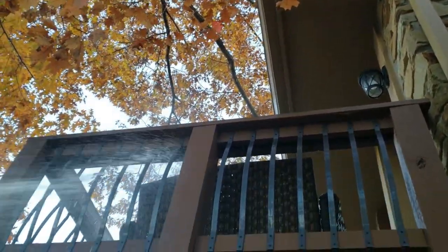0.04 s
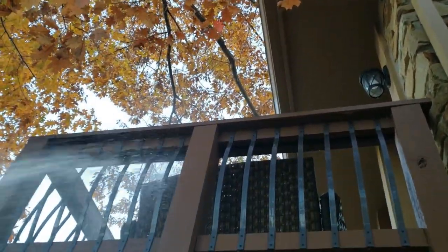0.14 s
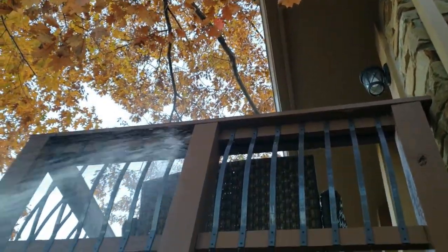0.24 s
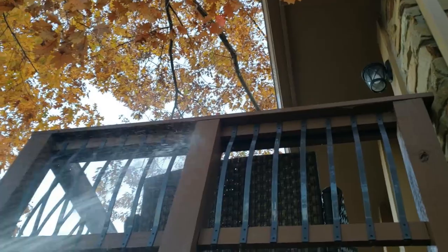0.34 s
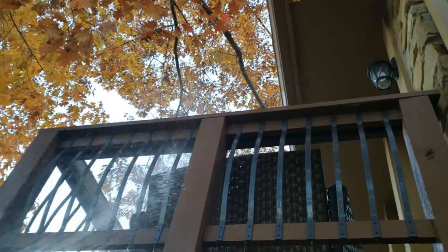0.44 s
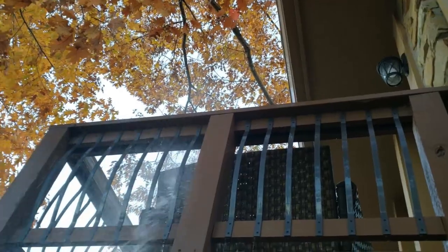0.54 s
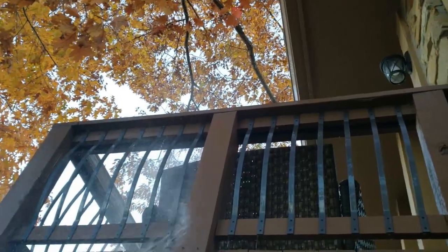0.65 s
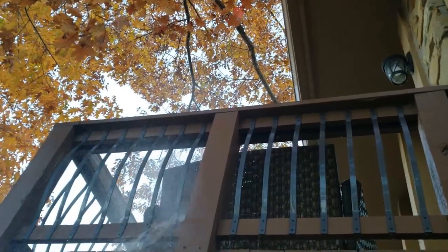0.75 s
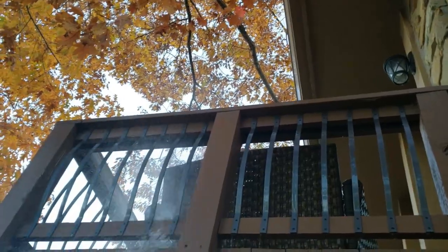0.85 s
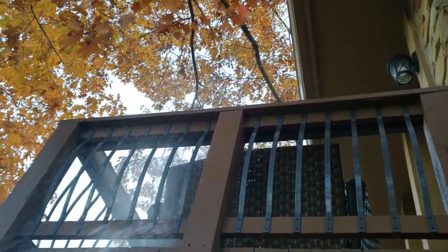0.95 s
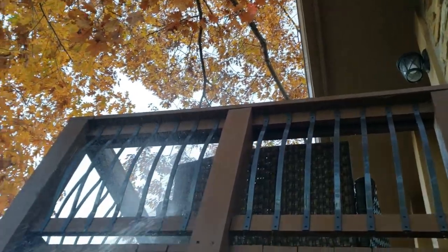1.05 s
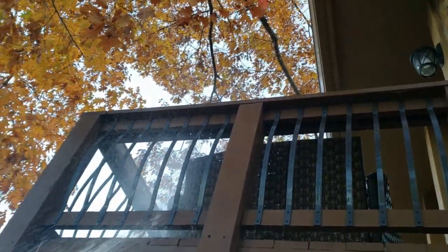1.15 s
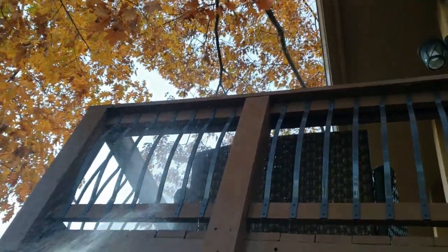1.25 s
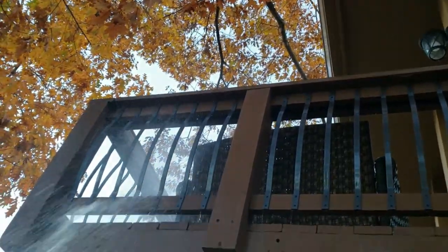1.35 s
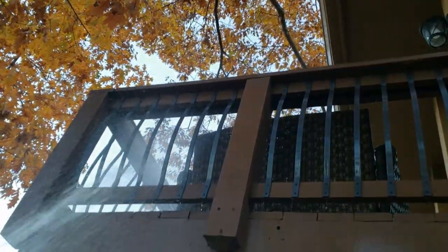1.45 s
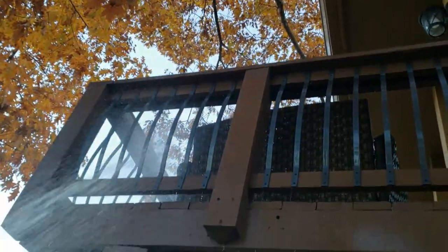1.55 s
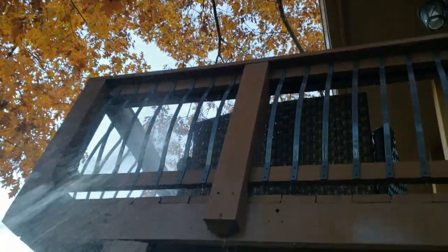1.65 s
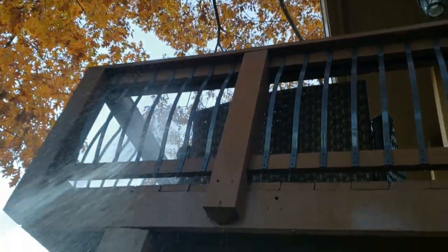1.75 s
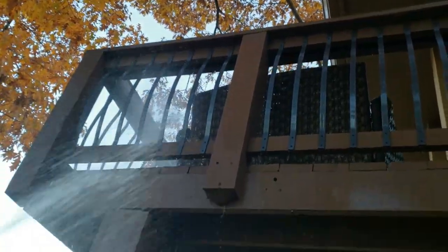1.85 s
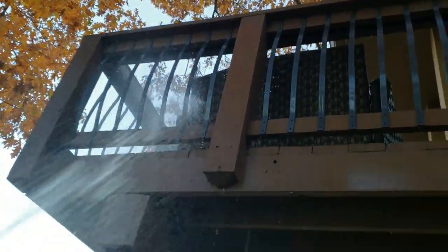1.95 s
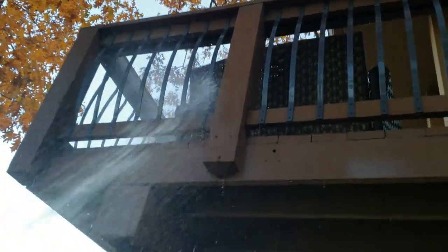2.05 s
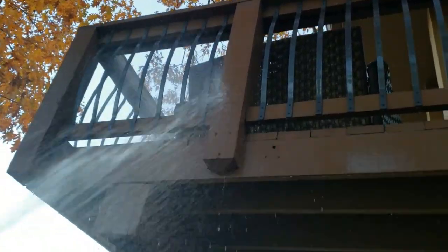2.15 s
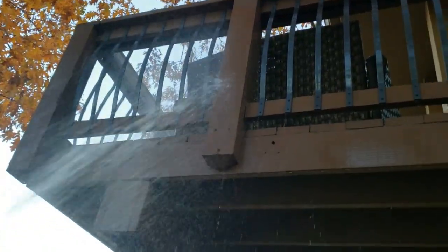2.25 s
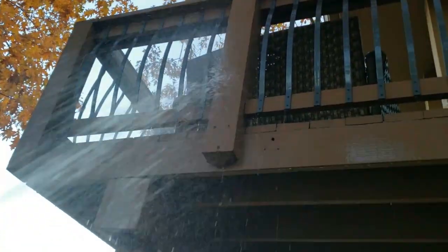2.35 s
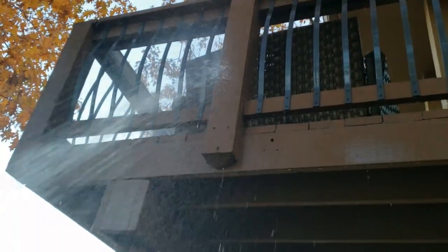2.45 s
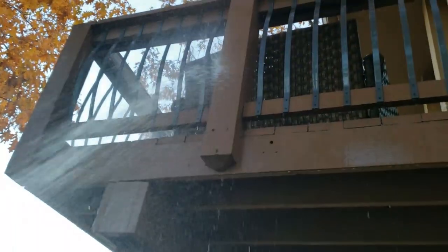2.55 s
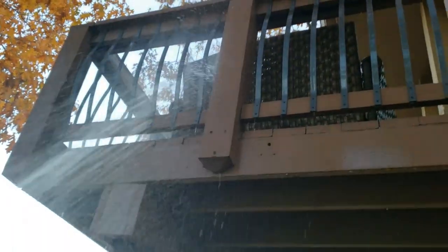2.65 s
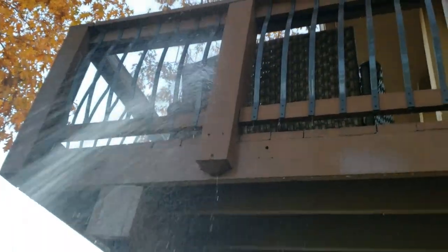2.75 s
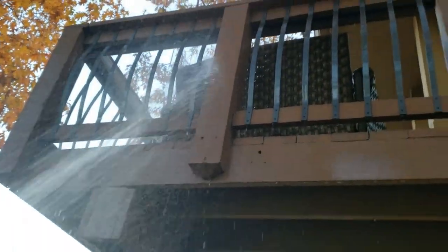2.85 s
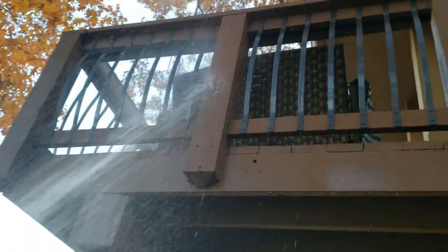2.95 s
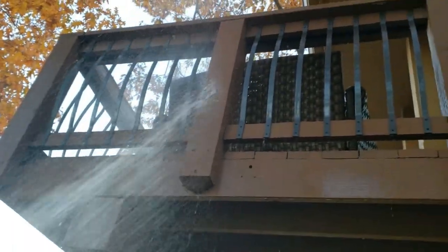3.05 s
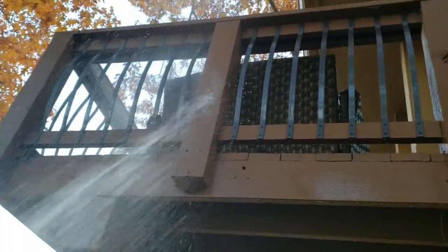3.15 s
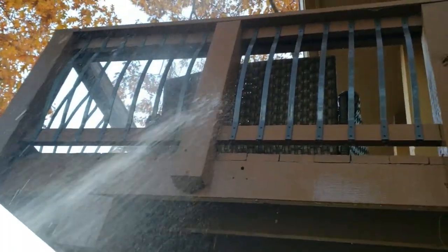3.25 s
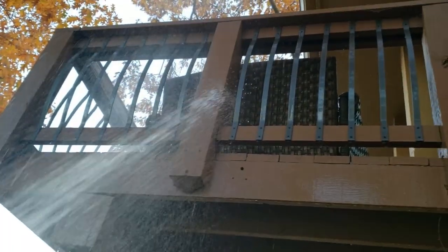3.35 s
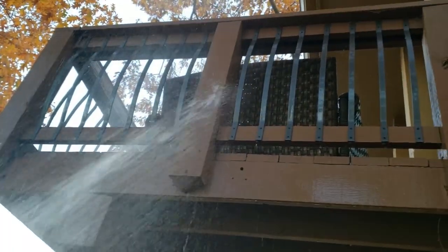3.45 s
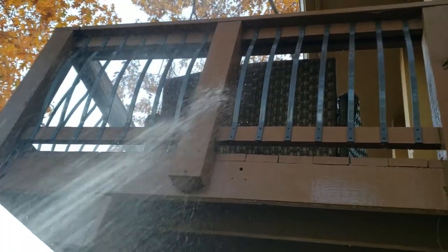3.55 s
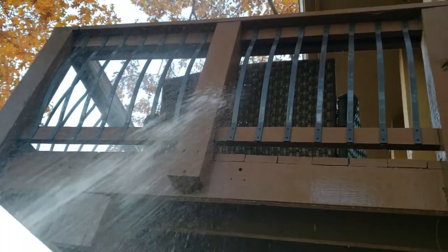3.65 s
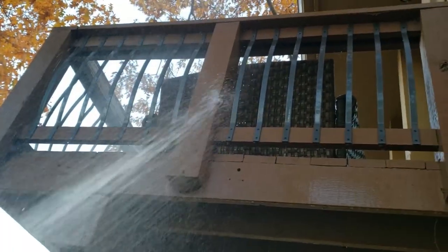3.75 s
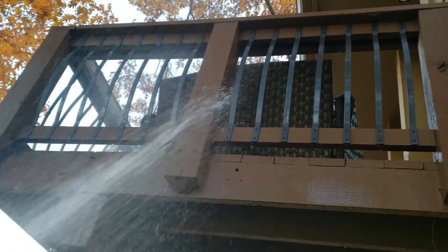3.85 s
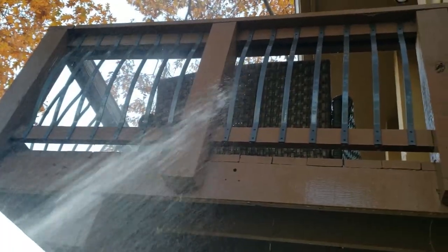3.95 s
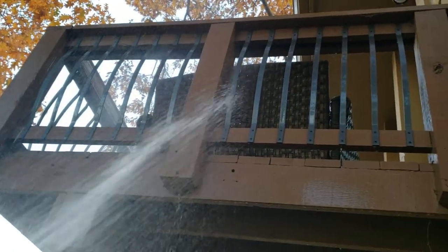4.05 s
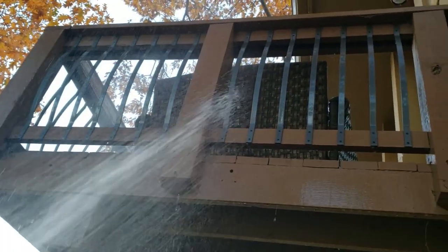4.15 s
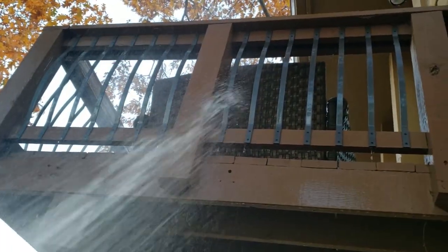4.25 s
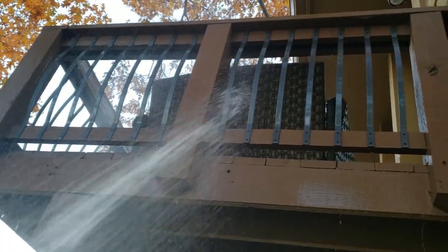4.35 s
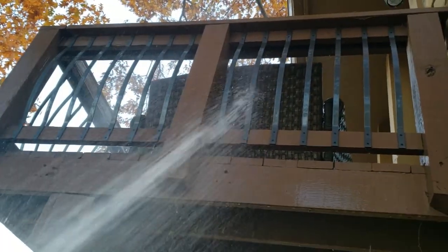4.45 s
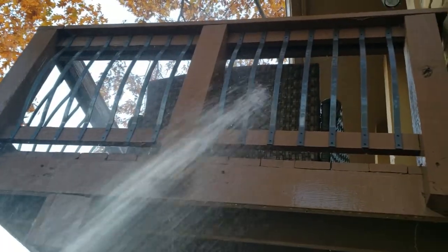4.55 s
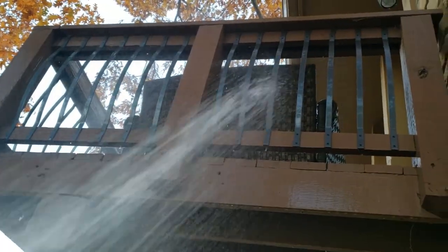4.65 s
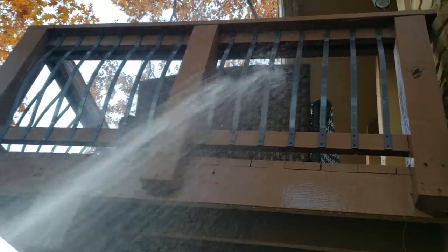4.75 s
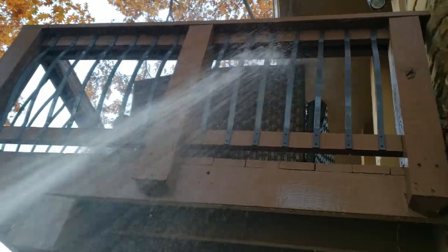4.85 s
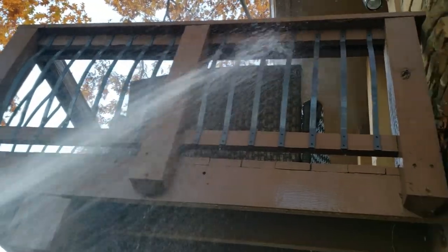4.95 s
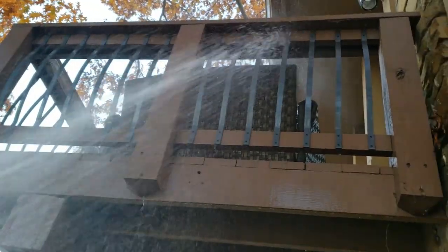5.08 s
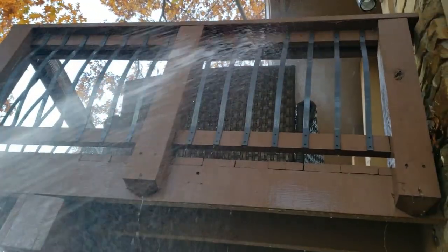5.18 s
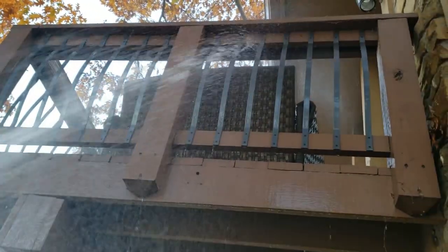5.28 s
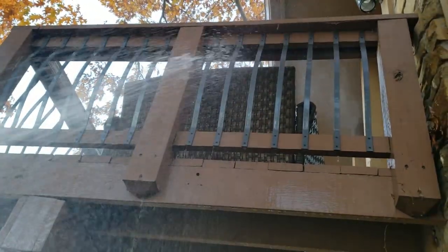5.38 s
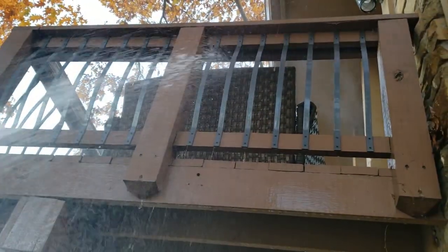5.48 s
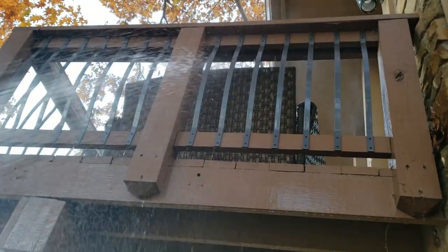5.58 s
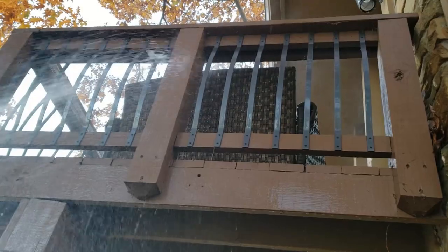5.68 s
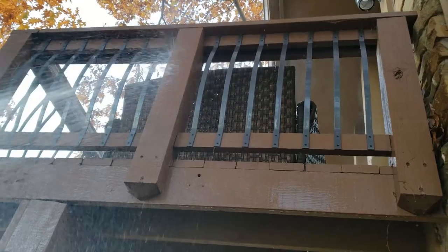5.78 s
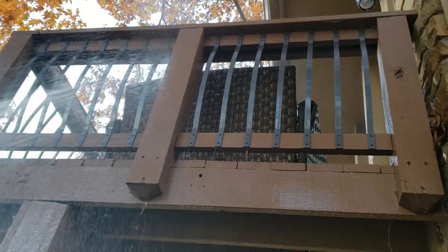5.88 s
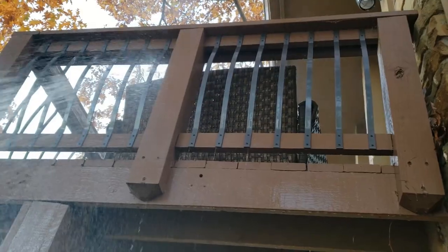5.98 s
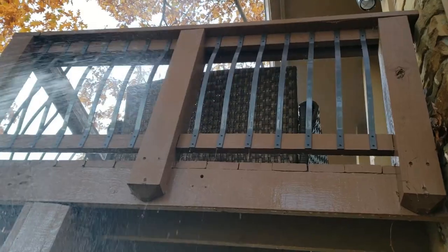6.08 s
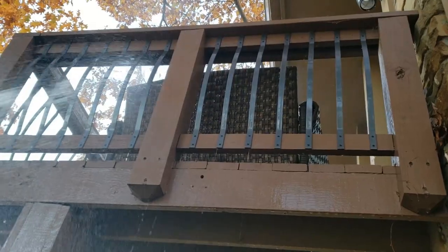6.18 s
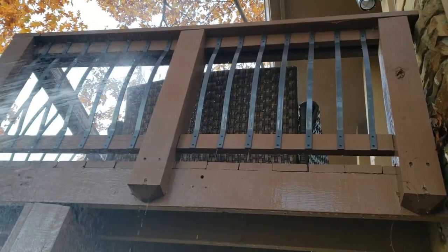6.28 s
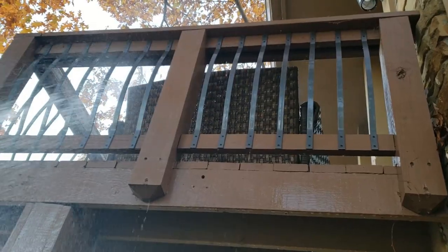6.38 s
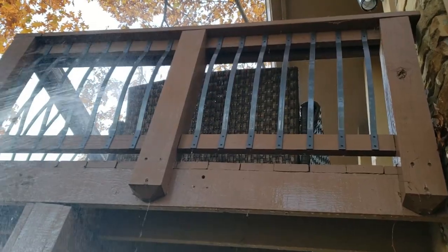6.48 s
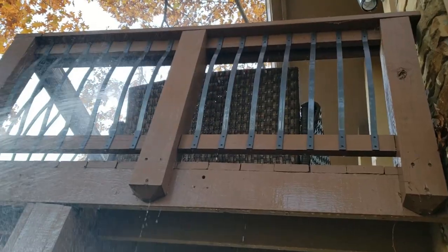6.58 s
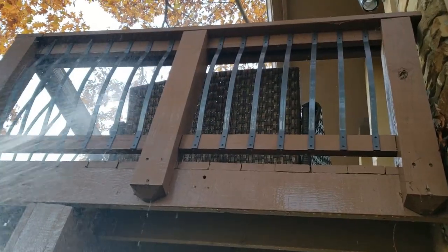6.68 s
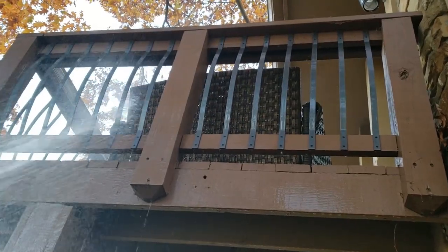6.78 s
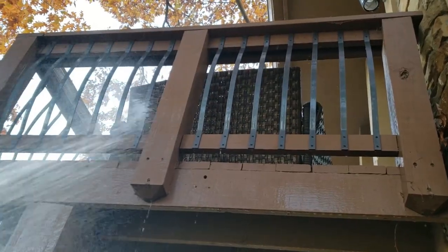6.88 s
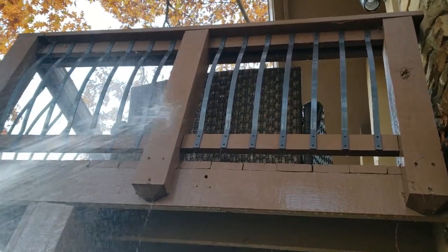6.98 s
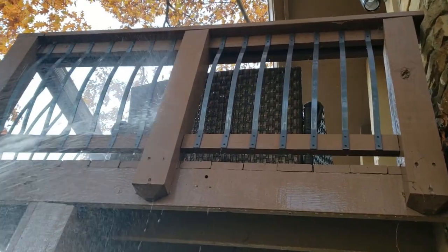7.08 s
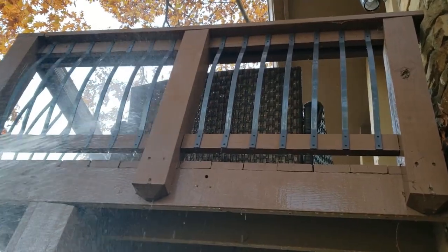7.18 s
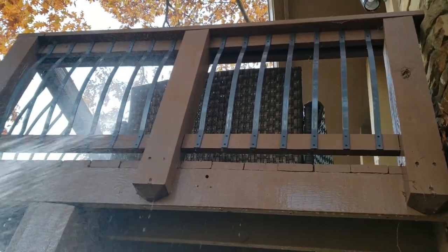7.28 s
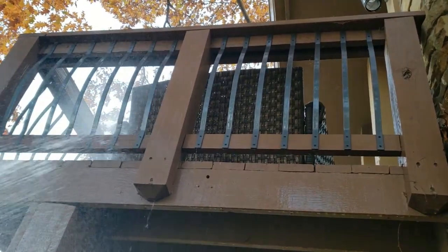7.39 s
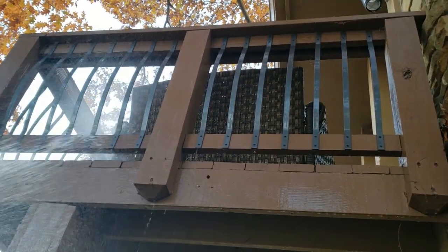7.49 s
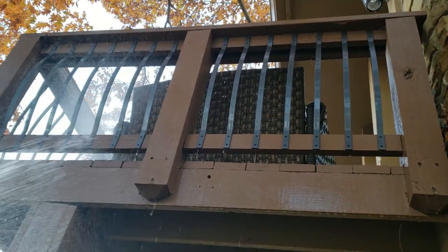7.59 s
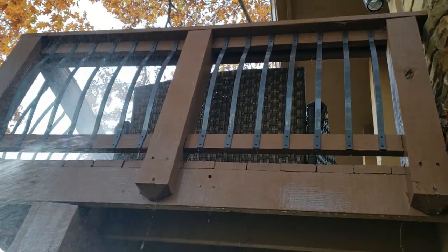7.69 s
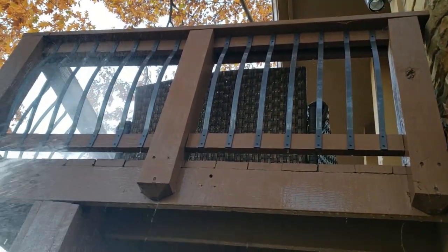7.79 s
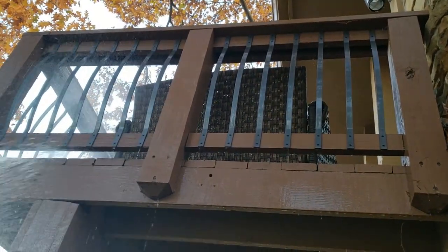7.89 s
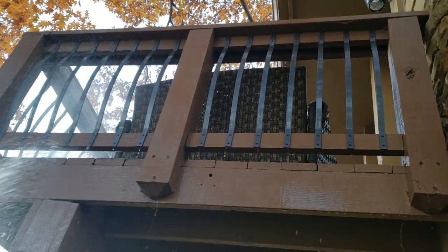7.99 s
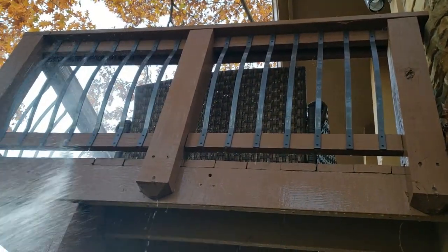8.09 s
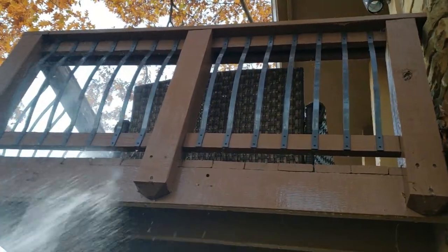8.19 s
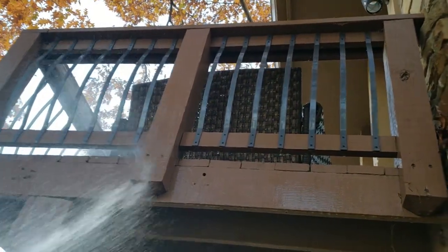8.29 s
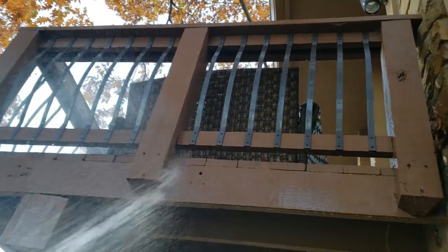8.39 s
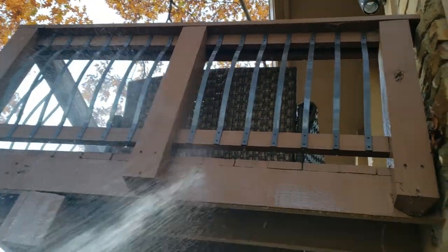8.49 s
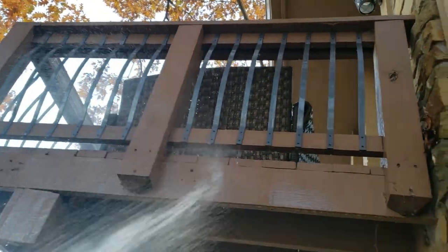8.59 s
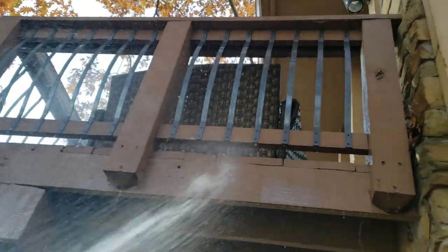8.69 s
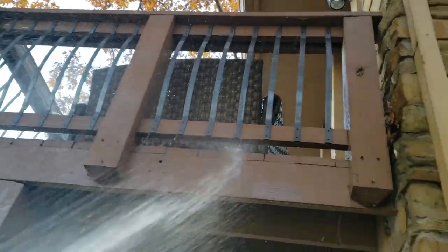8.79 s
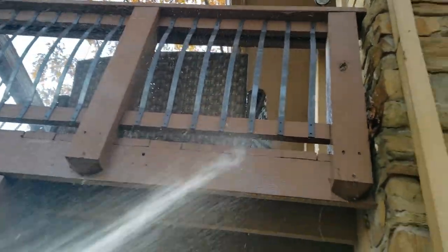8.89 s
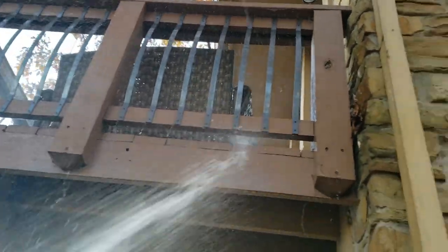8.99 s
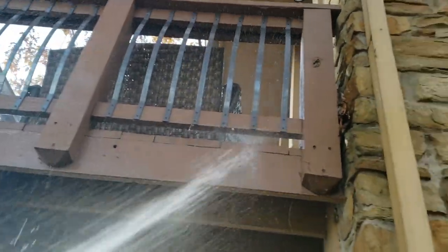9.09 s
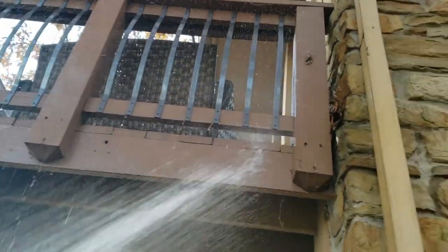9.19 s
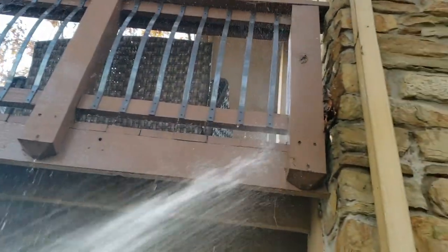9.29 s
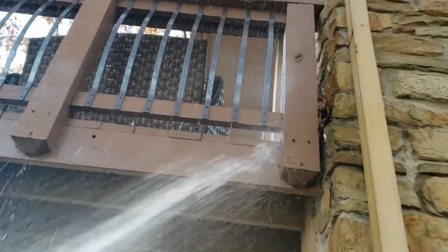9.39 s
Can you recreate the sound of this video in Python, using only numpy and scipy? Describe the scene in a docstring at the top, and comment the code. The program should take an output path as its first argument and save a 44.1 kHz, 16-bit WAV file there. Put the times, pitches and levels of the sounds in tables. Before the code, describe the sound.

Outdoors, close stereo pickup of a strong water jet: crisp, high, slightly sputtering hiss running from start to end, brighter or duller as the hand turns. It swells early, eases, rises again near the middle and towards the end. Occasional sharp drop ticks, muted patter on wood and low splashing sit underneath, with very faint distant machinery hum.

```python
"""A wooden deck: a garden hose, held beside a phone, sprays the rail. Hiss and bursting droplets are shaped noise and
random clicks, direct on the left, bent round the hand and phone to the right by paths that shift as the wrist turns.
Big drops snap as short damped rings; now and then the jet drums on boards, noise through resonant modes.
Splashing is dull wide noise; far machines hum as wavering tones over the noise rumble of the neighbourhood."""
import sys
import numpy as np
from scipy import signal
from scipy.fft import rfft, irfft, next_fast_len
from scipy.io import wavfile
from scipy.ndimage import uniform_filter1d, map_coordinates

SR = 44100
rng = np.random.default_rng(int(sys.argv[2]) if len(sys.argv) > 2 else 0)


def undo_db(level):
    """Turn decibels back into plain size, where 20 dB means ten times bigger."""
    steps = np.asarray(level, float) / 20
    return 10 ** steps


def persist_wave(psi):
    """Save psi, clipped to +-1, as 16-bit WAV."""
    counts = np.round(np.clip(psi, -1, 1) * 32767).astype(np.int16)
    wavfile.write(sys.argv[1], SR, np.atleast_2d(counts).T)


N = 415863  # length in samples


def unit(x):
    """Scales each channel to rms 1."""
    return x / np.sqrt(np.mean(x ** 2, -1, keepdims=True) + 1e-20)


def curves(rows, t):
    """Reads each column after the time at times t, with straight lines between rows."""
    s, *cols = np.transpose(rows)
    return np.array([np.interp(t, s, c) for c in cols])


def along(rows, hz):
    """Reads each column after the frequency on a log frequency axis."""
    f, *cols = np.transpose(rows)
    return np.array([np.interp(np.log(hz + 1), np.log(f + 1), c) for c in cols])


def wobble(rate):
    """A smooth random curve through normally distributed knots, rate knots a second."""
    knots = rng.standard_normal(N // 200)
    return map_coordinates(knots, [np.arange(N) * rate / SR])


def coloured(points, alike):
    """Stereo noise of rms 1 with a spectrum and a left-right likeness (0 to 1)."""
    m = next_fast_len(N)
    skirted = [(1, -120)] + points + [(points[-1][0] * 2, -90)]
    gain = undo_db(along(skirted, np.fft.rfftfreq(m, 1 / SR))[0])
    a, b = irfft(rfft(rng.standard_normal((2, m))) * gain, m)[:, :N]
    u = np.arccos(np.clip(alike, 0, 1)) / 2
    left = np.cos(u) * a + np.sin(u) * b
    right = np.cos(u) * a - np.sin(u) * b
    return unit(np.array([left, right]))


def droplets(per_s, spread_db, share):
    """Hiss of countless fine drops, with larger ones bursting as single clicks."""
    chance, size_draw, sign_draw = rng.random((3, N))
    size_db = np.minimum(-spread_db * np.log(1 - size_draw), 11)  # drops break up before growing huge
    bursts = undo_db(size_db) * np.sign(sign_draw - .5) * (chance < per_s / SR)
    return unit(rng.standard_normal(N) + share * unit(bursts))


def bend_round_phone(turn, blend, hz):
    """Short paths from left to right microphone add up to one filter that moves with the wrist."""
    # paths, some with faint wall bounces arriving right first (negative lag):
    # lag_ms, lag_change_ms per turn, share, share_change per turn
    paths = [(-0.622, 0.083, -0.05, -0.016), (-0.549, 0.043, -0.061, 0.003), (-0.345, 0.022, 0.059, 0.001),
             (-0.012, -0.011, 0.048, -0.029), (0.072, -0.003, 0.057, 0.011), (0.123, -0.041, 0.083, -0.029),
             (0.232, -0.064, 0.105, -0.034), (0.348, -0.041, 0.258, 0.035), (0.4, -0.041, 0.11, -0.144),
             (0.485, -0.033, -0.224, -0.081), (0.553, -0.024, -0.053, 0.051), (0.559, -0.083, 0.11, 0.032),
             (0.635, -0.048, -0.082, -0.006)]
    # how strongly the paths carry each band against the scattered spray, before a cap at 1:
    # freq_hz, factor at turn -.9, factor at turn 0, factor at turn +.5
    carry = [(1000, 1.24, 0.67, 1), (1900, 1.16, 1.2, 1.6), (2900, 1.2, 1.15, 1), (4400, 1.04, 1.4, 1.36),
             (5400, 1.2, 1.1, 1), (5800, 3, 1.3, 1.4), (6400, 2.1, 1.7, 1.9), (6700, 1, 1.3, 1.87),
             (8300, 2.1, 2.2, 2.4), (9250, 1.5, 1.6, 1.05), (10000, 1.1, 1, 0.73), (13000, 1.3, 1.5, 1.6),
             (15500, 1.2, 1.3, 1.2)]
    f = hz[:, None]
    bent = 0
    for lag_ms, lag_change_ms, share, share_change in paths:
        delay_s = (lag_ms + lag_change_ms * turn) / 1000
        bent = bent + (share + share_change * turn) * np.exp(-2j * np.pi * f * delay_s)
    bent = bent * (along(carry, hz).T @ blend)
    return bent / np.maximum(abs(bent), 1)


def spray():
    """One jet, heard directly on the left and over several short paths on the right, plus scattered spray."""
    # spray level at each microphone: time_s, left_db, right_db
    flow = [(0.0, -25, -25), (0.35, -24.5, -20.5), (0.8, -27.5, -23), (1.35, -26.5, -22.5),
            (1.75, -27, -21.5), (2.1, -28, -22), (3.4, -28, -21.5), (4.1, -27.3, -22), (4.75, -24.5, -20.5),
            (5.2, -26.5, -22.5), (6.0, -27.5, -23.9), (7.1, -27, -24.5), (7.6, -27, -25), (8.2, -24, -21.5),
            (8.6, -24, -23), (9.2, -23.5, -22.5), (9.43, -24, -24)]
    # wrist, from -1 (nozzle across the phone) to +.5 (towards its right end): time_s, turn
    wrist = [(0.1, -0.64), (0.35, -0.00094), (0.7, 0.086), (1.1, -0.19), (1.35, 0.19), (1.9, 0.63),
             (2.65, 0.46), (3.15, 0.44), (4.1, 0.62), (4.4, 0.39), (4.85, -0.17), (5.15, -0.97),
             (5.9, -1.05), (6.6, -0.95), (7.45, -1.13), (8.1, -0.48), (8.85, -0.86), (9.35, -1.13)]
    # wrist positions (turn) at which colour and carrying are given
    poses = [-.9, 0, .5]
    # relative spray colour at each microphone: freq_hz, gain_db at turn -.9, gain_db at turn 0, gain_db at turn +.5
    left_colour = [(340, -18, -8.8, -1), (520, -11, -15, -9), (2120, -8.5, -9, -7), (2750, -4, -6.5, -1.5),
                   (3200, -5.5, -5, -8), (3820, -3, -5, -2.5), (5300, -2.5, -5.5, -2), (5600, -2, -2, -5.5),
                   (6160, -2, -0.5, 0), (7410, 7, 3.5, 5), (8560, -1.5, -2, 2), (10600, 2, 1, 3.5),
                   (13400, 1, 0, -0.2), (15700, 6, 4.5, 7.5), (15960, 1, -3.5, 0.5)]
    right_colour = [(340, -16, -14, -16), (520, -21, -22, -21), (1350, -10.5, -12, -11),
                    (4510, 1.5, 1.3, 1), (7140, -5, -4.5, -4.5), (7450, -5, -10, -7), (7850, -8, -9, -13),
                    (8300, -10, -11, -10), (9300, -4.5, -2.5, -1.5), (9850, -3, -12, -4.5),
                    (11040, 4, 5, 6), (12060, 7, 7, 10), (13900, 5.5, 0, 2.5), (15100, 5.5, 7, 7.5),
                    (15800, 3.5, 4.5, 3)]
    frame = 256  # samples

    sputter_db = 0.6 * wobble(5.5) + 0.19 * wobble(14) + 0.41 * wobble(45)  # air in the stream makes the flow uneven
    sources = np.array([droplets(1500, spread_db=1.5, share=0.6), droplets(1500, spread_db=1.5, share=0.4)])
    hz, t, (jet, scattered) = signal.stft(undo_db(sputter_db) * sources, SR, nperseg=frame)

    tremor = 0.034 * np.interp(t, np.arange(N) / SR, wobble(3.92))
    turn = curves(wrist, t)[0] + tremor
    blend = np.array([np.interp(turn, poses, one) for one in np.eye(len(poses))])  # weight of each pose

    bent = bend_round_phone(turn, blend, hz)
    rest = np.sqrt(np.clip(1 - abs(bent) ** 2, 0, 1))  # scattered spray fills up the power
    heard = np.array([jet, bent * jet + rest * scattered])
    colour_db = np.array([along(left_colour, hz).T @ blend, along(right_colour, hz).T @ blend])

    # the stream breaks up in patches, each band a little on its own
    patches = uniform_filter1d(rng.standard_normal(heard.shape), size=5, axis=1)
    patches = uniform_filter1d(patches, size=30, axis=2)
    patch_db = 0.61 * patches / patches.std()
    low_cut = 1 / (1 + (700 / (hz[:, None] + 1)) ** 3)  # half amplitude near 700 Hz
    heard = heard * undo_db(colour_db + patch_db) * low_cut
    out = signal.istft(heard, SR, nperseg=frame)[1][:, :N]
    return undo_db(curves(flow, np.arange(N) / SR)) * unit(out)


def drops():
    """Big drops snap close by: a few damped cycles and a crack, later on the right."""
    # single big drops: start_s, level_db, ring_hz, left_over_right_db
    big_drops = [(0.1712, -19.5, 3620, -12), (0.342, -19.5, 2420, -10), (1.7744, -12.5, 7360, 4),
                 (2.7096, -31, 5270, -1.5), (4.0494, -30, 7160, 0.0), (5.157, -23, 3070, 4),
                 (5.2614, -26, 7690, 0.5), (5.3846, -30, 7300, 2.0), (6.4137, -19, 4900, -5),
                 (6.5794, -28, 7710, 1.5), (8.9154, -24, 7360, 3.0), (9.0442, -32, 7360, 4.0),
                 (9.2396, -18, 7410, 6)]
    right_lag_s = .00035
    out = np.zeros((2, N + SR))
    t = np.arange(SR // 100) / SR
    for start_s, level_db, ring_hz, pan_db in big_drops:
        ring = np.sin(2 * np.pi * ring_hz * t) + 0.27 * np.sin(2 * np.pi * 0.78 * ring_hz * t)
        crack = 0.49 * rng.standard_normal(len(t))
        attack = 1 - np.exp(-t / 0.00034)  # the drop flattens in under a millisecond
        snap = (ring + crack) * undo_db(-60 * t / 0.011) * attack
        for ear, side in enumerate((1, -1)):
            first = round((start_s + ear * right_lag_s) * SR)
            out[ear, first:][:len(t)] += undo_db(level_db + side * pan_db / 2) * snap
    return out[:, :N]


def drumming():
    """While the jet rests on the rail, rushing water drives the modes that the spot favours."""
    # the jet rests on the rail: start_s, end_s, level_db, favoured_hz, spread_octaves
    rests = [(0.221, 0.355, -48, 800, 0.48), (0.327, 0.628, -46, 1330, .3), (.45, 0.603, -55, 850, 0.33),
             (0.548, 0.958, -51.5, 1320, .1), (1.07, 1.13, -53, 1000, .2), (1.308, 1.56, -61, 640, .15),
             (3.549, 3.682, -51.5, 600, 0.95), (3.69, 3.784, -52, 433, .7), (5.644, 5.728, -56.5, 650, .15),
             (5.916, 6, -54, 655, 0.16), (6.36, 6.413, -51, 630, .15), (6.517, 6.584, -54, 820, .12),
             (7.019, 7.055, -43, 290, 0.28), (7.019, 7.188, -54.5, 1200, 0.33),
             (7.297, 7.364, -52, 1070, .1), (8.15, 8.35, -61, 660, 0.19), (8.521, 8.72, -63, 790, .1),
             (8.698, 9.25, -52, 1100, 0.11)]
    # modes of the rail, boards and balusters, each a resonance passed twice:
    # mode_hz, width_hz of one pass, level_db, left_over_right_db
    modes = [(249, 14, 2.5, -1), (275, 220, -6, -2), (500, 34, -19, -2), (640, 24, -3.5, 0),
             (803, 43, -3.5, 3), (943, 54, -7.5, 1), (1100, 190, -3, -1), (1324, 290, 0, -7),
             (1600, 530, -6.5, -9)]
    out = np.zeros((2, N))
    f = np.fft.rfftfreq(SR, 1 / SR)
    shapes = []
    for hz, width_hz, _, _ in modes:
        resonance = 1j * f * width_hz / (hz * hz - f * f + 1j * f * width_hz)
        shapes.append(resonance ** 2 / np.sqrt(width_hz / SR * np.pi / 2))  # offsets the loss in narrow modes
    for start_s, end_s, level_db, spot_hz, octaves in rests:
        body = 0
        for (hz, _, mode_db, pan_db), shape in zip(modes, shapes):
            favour = np.exp(-(np.log2(hz / spot_hz) / octaves) ** 2 / 2)
            body = body + undo_db(mode_db + np.array([[pan_db], [-pan_db]]) / 2) * favour * shape
        push = rng.standard_normal((2, SR))
        ring = irfft(rfft(push[0] + 0.28 * push) * body)  # mostly the same push on both sides
        n = min(round((end_s - start_s) * SR), SR)
        swell = np.sin(np.pi * np.arange(n) / n) ** 0.6
        out[:, round(start_s * SR):][:, :n] += undo_db(level_db) * ring[:, :n] * swell
    return out


def splash():
    """Water falling back on planks and ground: wide, dull noise of uneven level."""
    # splashing on wood and ground, midway between the microphones: time_s, level_db
    splash_level = [(0.0, -53.5), (0.6, -55), (1.6, -55), (2.1, -56.5), (3.2, -59.5), (3.7, -54),
                    (4.4, -55.5), (5.4, -56), (6.0, -59.5), (7.15, -54.5), (7.6, -57), (8.0, -54.5),
                    (9.43, -54)]
    # relative spectrum: freq_hz, gain_db
    splash_colour = [(150, -20), (300, 0.5), (700, 2.5), (1050, -1.5), (1600, -14)]
    uneven_db = 1.2 * wobble(5.8)
    level_db = curves(splash_level, np.arange(N) / SR) + uneven_db
    return undo_db(level_db + [[1.2], [-1.2]]) * coloured(splash_colour, alike=0.58)


def hum():
    """Low tones of far machines, each wavering in strength and phase."""
    # far machines: pitch_hz, level_db, waver_db
    tones = [(49.6, -66, 3.5), (64.6, -59.5, 1), (93, -61, 2), (99, -62.5, 2), (111.9, -56.5, 3.3),
             (130.8, -67.5, 1), (226.1, -70, 2), (243.6, -67.5, 3.5), (341.2, -70.5, 2), (1359, -69, 2.5)]
    t = np.arange(N) / SR
    total = 0
    for pitch_hz, level_db, waver_db in tones:
        strength = np.sqrt(2) * undo_db(level_db + waver_db * wobble(2.423))  # from rms to peak
        phase_waver = 0.38 * waver_db * wobble(3)  # radians
        total = total + strength * np.sin(2 * np.pi * (pitch_hz * t + rng.random()) + phase_waver)
    return total * undo_db([[.8], [-.8]])


def rumble():
    """Distant traffic and air: low noise, nearly alike at both microphones."""
    # relative spectrum: freq_hz, gain_db
    rumble_colour = [(15, -42), (25, -20), (75, -1.5), (102, -7.5), (127, -2.5), (178, -12), (235, -9),
                     (289, -13.5), (400, -15), (520, -27), (880, -120)]
    swell_db = .8 * wobble(3)
    return undo_db(-54.5 + swell_db + [[.8], [-.8]]) * coloured(rumble_colour, alike=0.84)


def scene():
    """Everything at the two microphones."""
    return spray() + drops() + drumming() + splash() + hum() + rumble()


def low_pass(x):
    """Removes everything above the highest recorded frequency."""
    return signal.sosfilt(signal.butter(12, 17100, fs=SR, output="sos"), x)


def record(dry):
    """The right port has a narrow resonant dip; the phone keeps nothing above its band limit."""
    # narrow dip in the right microphone's response: dip_hz, width_hz, share removed at the centre
    port_dip = (7500, 420, .88)
    dip_hz, width_hz, share = port_dip
    m = next_fast_len(N)
    hz = np.fft.rfftfreq(m, 1 / SR)
    band = hz < 15780
    dip = 1 - share * 1j * hz * width_hz / (dip_hz ** 2 - hz ** 2 + 1j * hz * width_hz)
    heard = irfft(rfft(dry, m) * [band, dip * band], m)[:, :N]
    return low_pass(heard)


dry = scene()
out = record(dry)
persist_wave(out)
```